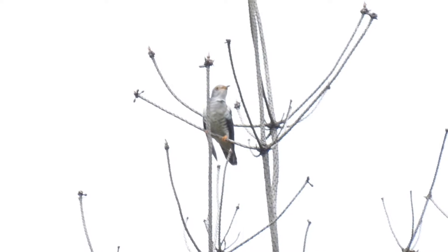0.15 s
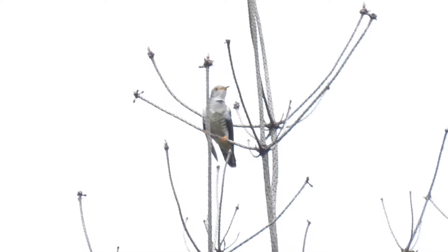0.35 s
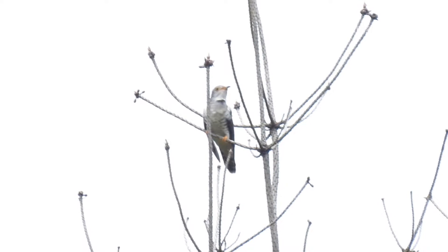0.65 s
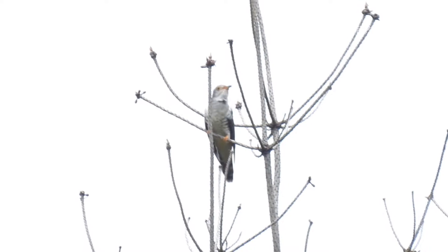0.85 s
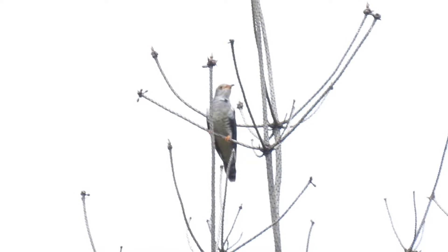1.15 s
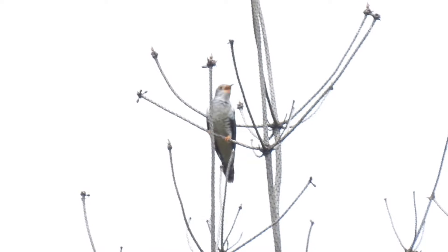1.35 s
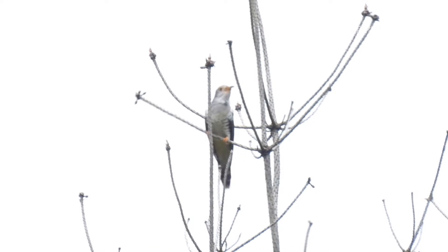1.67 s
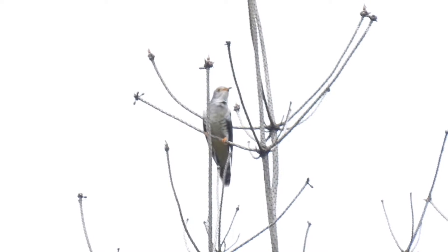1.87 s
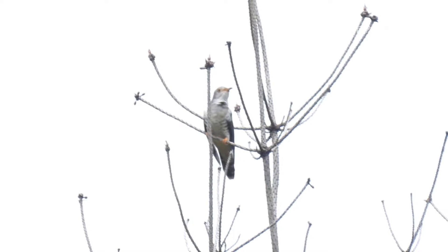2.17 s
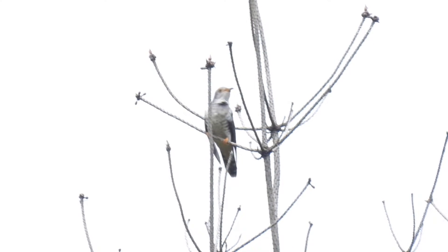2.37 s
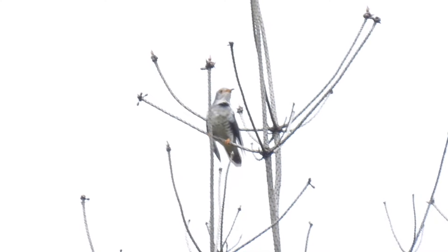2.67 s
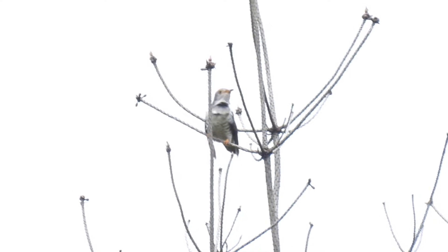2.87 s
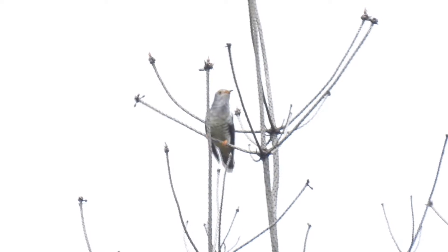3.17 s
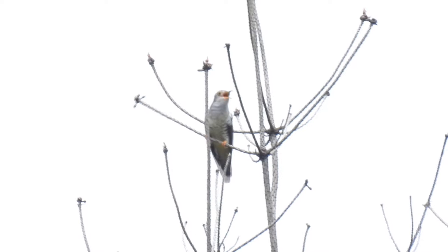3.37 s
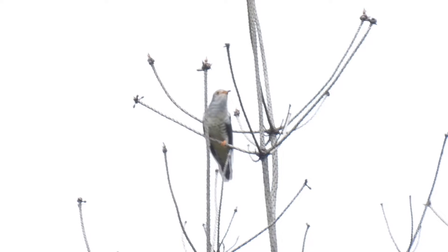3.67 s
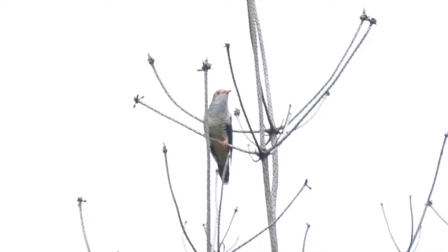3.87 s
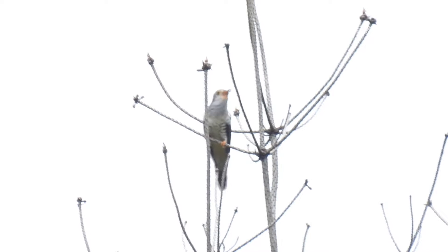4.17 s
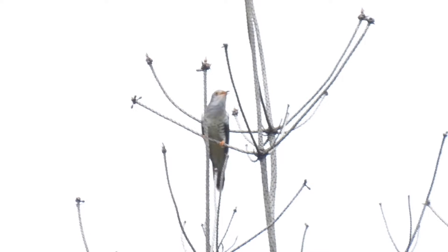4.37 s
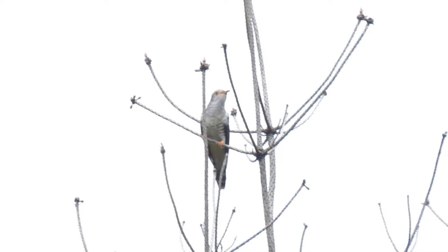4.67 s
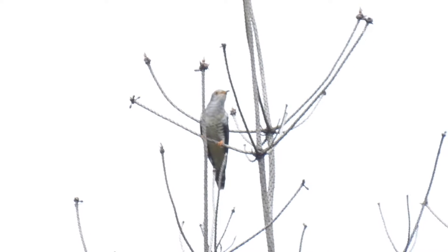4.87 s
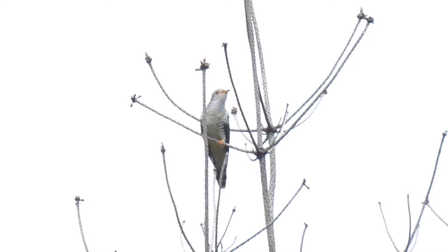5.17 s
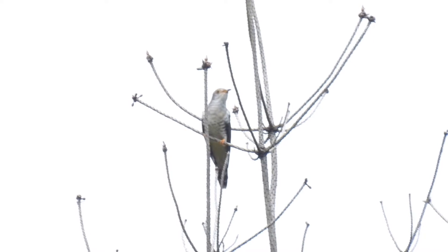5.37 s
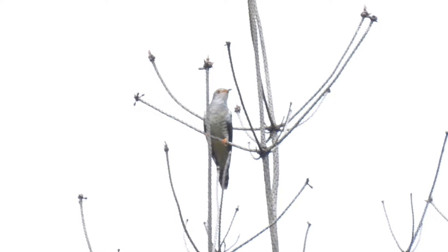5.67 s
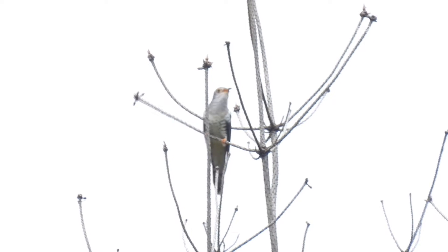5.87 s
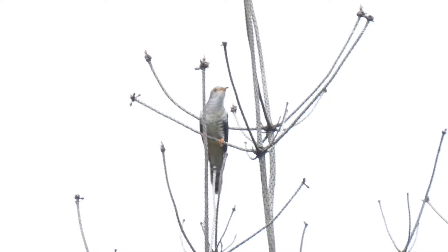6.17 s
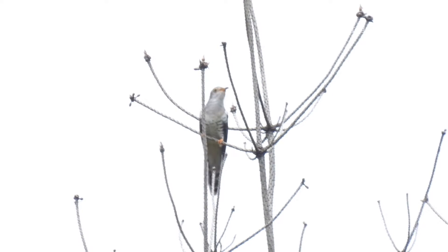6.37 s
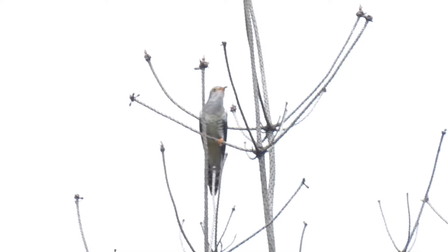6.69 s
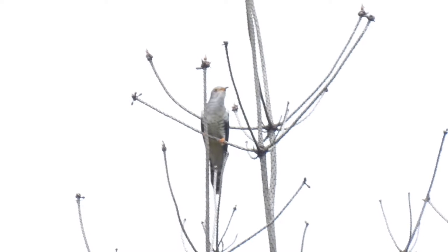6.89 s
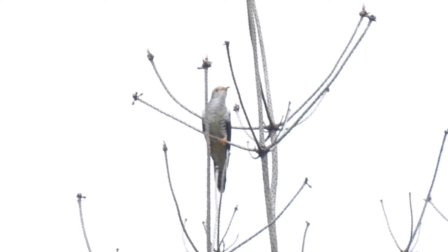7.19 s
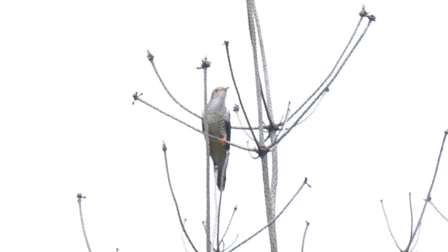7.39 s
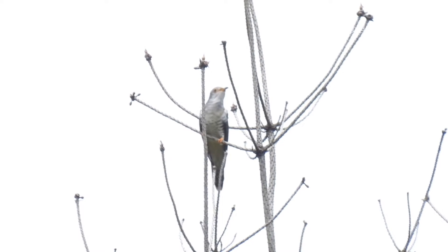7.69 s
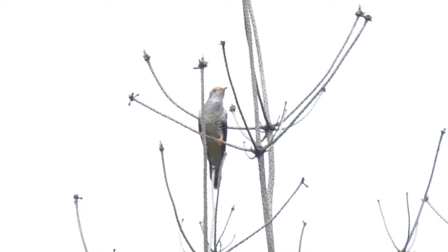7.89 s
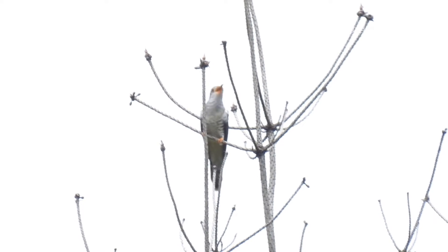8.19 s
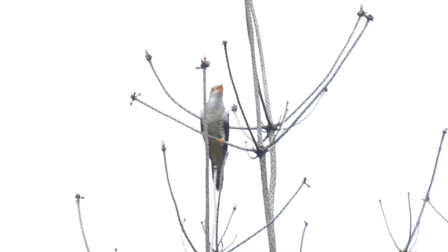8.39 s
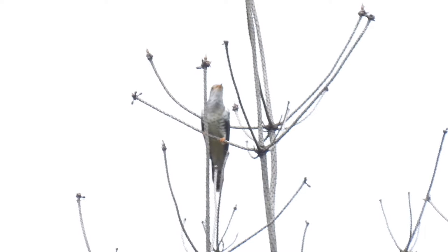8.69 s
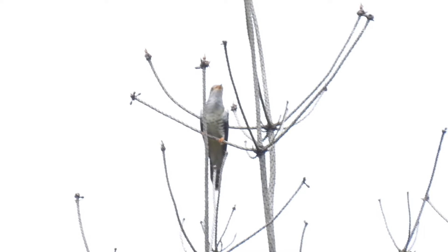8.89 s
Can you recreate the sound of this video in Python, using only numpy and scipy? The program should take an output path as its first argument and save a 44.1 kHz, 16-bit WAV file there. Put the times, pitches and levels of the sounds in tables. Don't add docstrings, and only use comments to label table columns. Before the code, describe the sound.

Outdoors at a wood's edge, a single cuckoo calls from some distance. After a second of plain hiss it gives six quick, piping whistles, each rising and falling in a flash. Pauses of nearly two seconds separate further phrases; the second is the brightest and the last has only four notes. Branches add a slight echo and short tail. A steady wash of far water and leaves fills the background, with faint low wind on the microphone.

```python
import sys
import numpy as np
from scipy import signal
from scipy.fft import rfft, irfft, next_fast_len
from scipy.io import wavfile
from scipy.ndimage import uniform_filter1d

SR = 44100
rng = np.random.default_rng(int(sys.argv[2]) if len(sys.argv) > 2 else 0)


def boost_factor(decibels):
    exponent = np.asarray(decibels, float) / 20
    return 10 ** exponent


def dump(signal):
    limited = np.clip(np.atleast_2d(signal).T, -1, 1)
    pcm = np.round(limited * 32767).astype(np.int16)
    wavfile.write(sys.argv[1], SR, pcm)


N = 398663


def walk(rate):
    hold = int(SR / rate)
    steps = np.repeat(rng.standard_normal(N // hold + 1), hold)
    return 1.65 * uniform_filter1d(uniform_filter1d(steps, hold), hold)[:N]


def read(table, hz):
    table_hz, value = np.transpose(table)
    return np.interp(np.log(hz), np.log(table_hz), value)


# start in seconds, length as a share of the usual, top pitch in Hz,
# level in dB, level of the near echo in dB.
NOTES = [(1.105, 0.78, 2166, -16, -4.5), (1.323, .97, 2440, -12.5, -17), (1.542, 1.03, 2277, -16, -7),
         (1.706, 0.93, 2670, -12, -7), (1.871, 0.95, 2540, -12, -9), (2.032, 0.99, 2238, -14.5, -2),
         (3.7, 0.83, 2120, -19, -9), (3.917, 0.95, 2427, -13, -3.5), (4.14, 0.95, 2302, -10.5, -7),
         (4.302, 0.94, 2606, -8.5, -15), (4.463, 0.99, 2543, -10, -4.5), (4.63, 0.98, 2257, -11, -3),
         (6.156, 1.01, 2136, -21, -4.5), (6.376, 1, 2380, -18, -4.5), (6.601, .98, 2290, -17, -3.5),
         (6.766, .96, 2523, -13, -9), (6.93, 1.01, 2420, -14, -6), (7.096, 0.96, 2230, -13, -7),
         (8.292, 1.08, 1952, -16.5, -7.5), (8.528, 0.92, 2222, -11, -4), (8.747, 1.01, 2183, -16.5, -6),
         (8.922, .84, 2260, -14, -5.5)]
# time from the note's start in seconds, pitch in Hz, effort in dB.
RISE = [(0, 1756, -18), (.006, 1950, -10.5), (.013, 2030, -5), (.023, 2046, 0.5), (.036, 2150, 0),
        (.041, 2120, -1), (.047, 1920, -13)]
STEP = [(0, 2150, -22), (.008, 2344, -12), (.014, 2407, -6), (.021, 2260, -0.5), (.03, 2015, -0.5),
        (.05, 1975, -3.5), (.057, 1900, -6.5), (.063, 1750, -24)]
DOUBLE = [(0, 2187, -21), (.009, 2280, -8.5), (.018, 1710, -6.5), (.023, 1537, -10.5), (.035, 1986, -2.5),
          (0.039, 2100, -0.5), (.051, 1614, -5), (.07, 1250, -21)]
DIVE = [(0, 1914, -29), (0.01, 2444, -9), (.02, 2594, 2), (.027, 2576, 5), (.034, 2194, -4.5),
        (.038, 1856, -4), (.044, 1465, -12), (.052, 1350, -14), (.064, 1240, -21)]
ARCH = [(0, 1740, -21), (0.01, 2310, -6.5), (.022, 2533, 2.5), (.032, 2462, 2.5), (.042, 2200, 0),
        (.055, 1520, -8.5), (.073, 1390, -16)]
SLIDE = [(0, 1604, -21.5), (.017, 2142, 0), (.026, 2263, -1), (.033, 2160, 2), (.042, 1935, -0.5),
         (.054, 1912, -4.5), (.066, 1780, -10), (.084, 1550, -17)]
SLACK_STEP = [(0, 1850, -18), (.01, 2210, -9), (0.016, 2176, -1.5), (0.025, 1670, -10), (.037, 1846, -10),
              (.049, 1670, -1.5), (.079, 1540, -19)]
SLACK_DOUBLE = [(0, 1784, -19), (.013, 2200, -3), (0.026, 1460, -6.5), (0.03, 1320, -9), (.044, 1786, -0.5),
                (.063, 1330, -10), (.073, 1260, -18)]
GESTURES = 3 * [RISE, STEP, DOUBLE, DIVE, ARCH, SLIDE] + [RISE, SLACK_STEP, SLACK_DOUBLE, ARCH]
# start in seconds, overtone level in dB,
# third overtone over the fourth in dB, delay of the near echo in ms, depth of the pitch glides (1 = usual).
HEAD = [
    (1.0, -54, -5, 2.14, 0.95),
    (3.6, -42.5, -5.5, 2.17, 1.034),
    (6.0, -47, 4, 2.163, 1.07),
    (8.2, -54, -3, 2.14, 1),
]
# pitch in Hz, level in dB.
THROAT = [(1200, -11), (1600, -0.2), (1900, -2.9), (2100, 0.7), (2300, -2), (2430, -2.5), (2530, -13),
          (2680, -29)]
GAPE_DB = (-7, -.5, -5, 2, -4, -12)


def cuckoo():
    beak_hz, beak_width_hz = 9300, 5300
    second_db = -56
    third_grows, loud_note_db = 0.56, -11.5
    voice, near_echo = np.zeros((2, N))
    waver = walk(120)
    for place, (gesture, note) in enumerate(zip(GESTURES, NOTES)):
        start, length, top_hz, level_db, echo_db = note
        s, hz, db = np.transpose(gesture)
        _, facing_db, third_db, late_ms, depth = [row for row in HEAD if row[0] < start][-1]
        s = start + length * s
        hz = top_hz * (hz / hz.max()) ** depth
        fourth_db = facing_db + GAPE_DB[place % len(GAPE_DB)]
        third_db = fourth_db + third_db + third_grows * (level_db - loud_note_db)

        i = np.arange(int(s[0] * SR), min(int(s[-1] * SR) + 200, N))
        hz = uniform_filter1d(np.interp(i / SR, s, hz), size=130, mode="nearest")
        db = uniform_filter1d(np.interp(i / SR, s, db), size=130, mode="nearest")
        phase = 2 * np.pi * np.cumsum(hz * (1 + 0.0013 * waver[i])) / SR
        edge = np.clip(np.minimum(i / SR - s[0], s[-1] - i / SR) / 0.0025, 0, 1)
        tone = edge * boost_factor(level_db + db + read(THROAT, hz) + 1.5) * np.sin(phase)

        near_echo[i] += boost_factor(echo_db) * np.interp(i - late_ms * SR / 1000, i, tone)

        effort = np.clip((hz - hz.min()) / (hz.max() - hz.min()), 0, 1) ** 1.7
        for order, gain_db in enumerate((second_db, third_db, fourth_db), 2):
            beak = 1 / (1 + ((order * hz - beak_hz) / beak_width_hz) ** 2)
            tone += boost_factor(gain_db + 8.0) * edge * effort * beak * np.sin(order * phase)
        voice[i] += tone
    return voice, near_echo


# delay in seconds, level in dB.
ECHOES = [
    (.0061, -14),
    (.013, -15.5),
]


def woods(x):
    fade_s, tail_db, gap_s, leaves_hz = 0.4, -15, 0.03, 2000
    t = np.arange(SR // 2) / SR
    tail = rng.standard_normal(len(t)) * boost_factor(-60 * t / fade_s) * np.clip(t / gap_s, 0, 1)
    tail /= np.sqrt(np.sum(tail ** 2))
    thin = signal.sosfilt(signal.butter(2, leaves_hz, "high", fs=SR, output="sos"), x)
    out = boost_factor(tail_db) * signal.fftconvolve(thin, tail)[:N]
    for late_s, db in ECHOES:
        out += boost_factor(db) * np.interp(np.arange(N) - late_s * SR, np.arange(N), x)
    return out


# pitch in Hz, level in dB per Hz.
HISS = [(15, -50), (25, -34), (96, -16), (130, -13), (400, -9), (1040, -.5), (1520, -3), (2300, -5.5),
        (4230, -9.5), (6400, -14.5), (8780, -17), (12000, -19), (13000, -23.5), (15900, -25.5)]
# pitch in Hz, difference below the shared sound in dB.
APART = [(30, -13), (110, -21), (200, -26), (380, -29), (700, -34.5), (1100, -38.5), (7000, -37),
         (9500, -25.5), (13500, -22.5), (14800, -17), (16000, -58)]
# time in seconds, gust level in dB.
GUST = [(0.0, -80), (1.79, -72), (1.89, -68), (2.47, -88), (4.1, -87), (4.81, -68), (4.98, -78),
        (5.76, -80), (5.92, -87), (7.55, -83), (7.98, -79), (9.04, -81)]


def hiss():
    level_db = -33
    rumble = np.interp(np.arange(N) / SR, *np.transpose(GUST))
    rumble = rumble - np.mean(rumble)
    hum, water, leaves = -0.14 * rumble, 0.042 * rumble, 0.17 * rumble
    high = 0.37 * walk(11)

    size = next_fast_len(N)
    f = np.arange(1, size // 2 + 2) * SR / size
    noise = rfft(rng.standard_normal(size)) * boost_factor(read(HISS, f))
    side_noise = rfft(rng.standard_normal(size)) * boost_factor(read(HISS, f) + read(APART, f))
    side = irfft(side_noise, size)[:N] + flecks()
    mid = np.zeros(N)
    for hz in 20 * 2 ** np.arange(0, 10, 0.5):
        band = np.cos(np.pi * np.clip(np.log2(f / hz), -0.5, 0.5)) ** 2
        if hz < 50:
            swell_db = rumble
        elif hz < 450:
            swell_db = hum
        elif hz < 1500:
            swell_db = water
        elif hz < 2700:
            swell_db = leaves
        else:
            swell_db = high
        drift_db, flicker_db = 0.3 * walk(1.5), 0.35 * walk(12)
        mid += boost_factor(swell_db + drift_db + flicker_db) * irfft(noise * band, size)[:N]
    mid = sway(mid)
    return np.array([mid + side, mid - side]) * boost_factor(level_db) / np.sqrt(np.mean(mid ** 2))


FLECK_EDGES_HZ = [4400, 5800, 7000, 8500, 9300, 10200, 11200, 12000, 12700, 13400, 14100, 14900]


def flecks():
    f, t, z = signal.stft(rng.standard_normal(N), SR, nperseg=1024)
    chance = rng.random((len(t), len(FLECK_EDGES_HZ) + 1)).T
    gain = np.zeros(z.shape)
    for k, (low_hz, high_hz) in enumerate(zip(FLECK_EDGES_HZ, FLECK_EDGES_HZ[1:])):
        place = k / (len(FLECK_EDGES_HZ) - 2)
        share = np.interp(place, (0, 1), (0.012, 0.02))
        luck = np.minimum(chance[k], chance[k + 1]) * (0.3 + 1.4 * chance[-1])
        gain[(f >= low_hz) & (f < high_hz)] = (luck < share / 2) * boost_factor(-2)
    return signal.istft(z * gain * boost_factor(read(HISS, f + 1))[:, None], SR)[1][:N]


# time in seconds, pitch in Hz, depth in dB.
SWAY = [(0, 8700, 3.5), (1.1, 9500, 2), (2.0, 9360, 3), (2.4, 9200, 1), (4.3, 9300, -1), (4.7, 9300, 3.5),
        (5.5, 9100, 0), (5.9, 8800, 1), (7.5, 8300, .1), (7.8, 8600, 3), (8.3, 9300, 2), (9.04, 9500, 4)]


def sway(x):
    dip_width_hz = 340
    f, t, z = signal.stft(x, SR, nperseg=512)
    s, hz, depth_db = np.transpose(SWAY)
    away = (f[:, None] - np.interp(t, s, hz)) / dip_width_hz
    dip_db = np.interp(t, s, depth_db) * np.exp(-away ** 2)
    return signal.istft(z * boost_factor(-dip_db), SR)[1][:N]


def scene():
    voice, near_echo = cuckoo()
    return voice + near_echo + woods(voice) + hiss()


def low_pass(x):
    return signal.sosfilt(signal.butter(12, 15750, fs=SR, output="sos"), x)


def record(dry):
    top_hz = 15750
    cut = signal.sosfilt(signal.ellip(10, 0.2, 70, top_hz, fs=SR, output="sos"), dry)
    return low_pass(cut)


dry = scene()
out = record(dry)
dump(out)
```